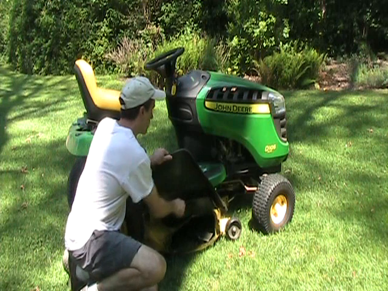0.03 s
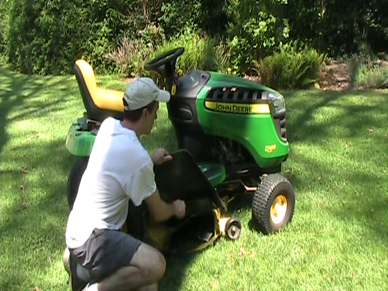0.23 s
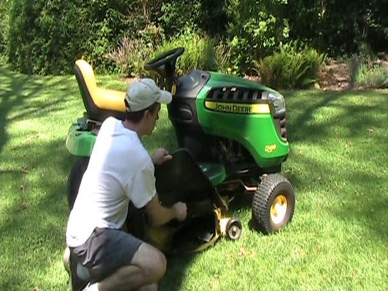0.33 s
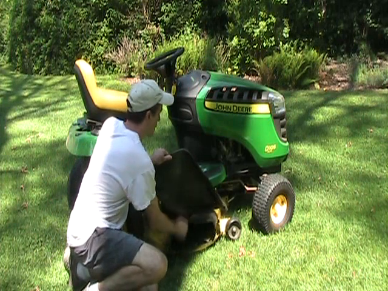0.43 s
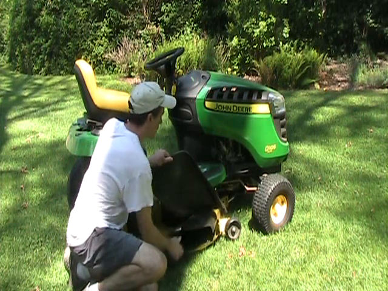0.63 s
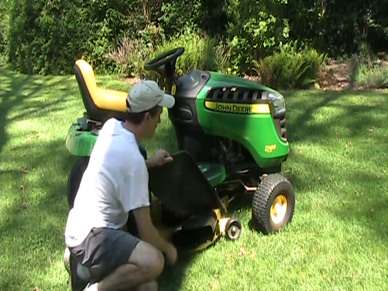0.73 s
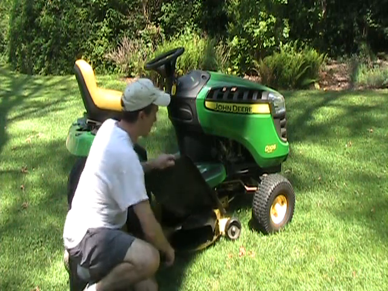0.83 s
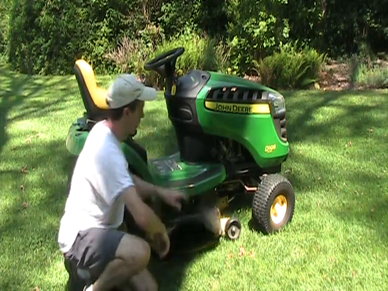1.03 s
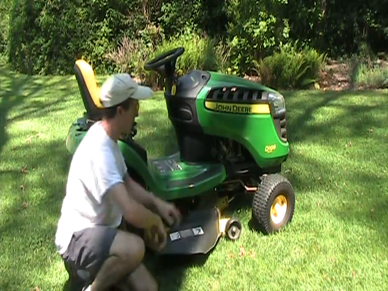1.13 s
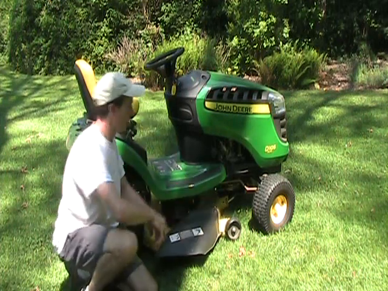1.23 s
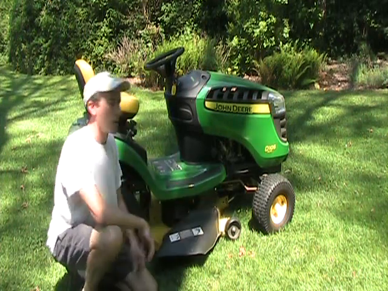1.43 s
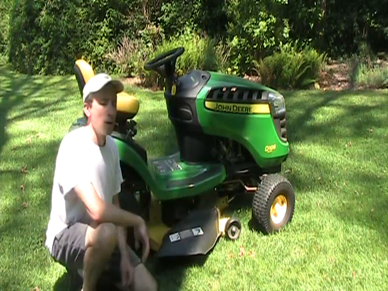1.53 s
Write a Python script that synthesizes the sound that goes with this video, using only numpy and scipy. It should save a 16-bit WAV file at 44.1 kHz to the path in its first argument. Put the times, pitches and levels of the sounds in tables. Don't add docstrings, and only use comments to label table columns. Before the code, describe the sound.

A hinged plastic mower chute is handled and dropped: gritty metal scrapes and thin squeaks, a sharp hollow knock midway, more faint scraping, then a loud clattering fall with quick bounces, close microphone in a quiet garden.

```python
import sys
import numpy as np
from scipy import signal
from scipy.fft import rfft, irfft
from scipy.io import wavfile
from scipy.ndimage import uniform_filter1d

SR = 44100
rng = np.random.default_rng(int(sys.argv[2]) if len(sys.argv) > 2 else 0)


def master_out(mix):
    frames = np.transpose(np.atleast_2d(mix))
    ceiling = np.clip(frames, -1, 1)
    pcm = np.round(ceiling * 32767).astype(np.int16)
    wavfile.write(sys.argv[1], SR, pcm)


def voltage_ratio(level):
    return 10 ** (np.asarray(level, float) / 20)


N = 70560


def evened(x):
    return x / np.sqrt(np.mean(x ** 2) + 1e-20)


def read(points, hz):
    f, value = np.transpose(points)
    return np.interp(np.log(hz + 1), np.log(f + 1), value)


def add(mix, s, sound):
    part = mix[max(round(s * SR), 0):][:len(sound)]
    part += sound[:len(part)]


def coloured(x, points):
    size = x.shape[-1]
    gain = voltage_ratio(read(points, np.fft.rfftfreq(size, 1 / SR)))
    return irfft(rfft(x) * gain, size)


def slow(span_s):
    span = round(span_s * SR)
    return evened(uniform_filter1d(uniform_filter1d(rng.standard_normal(N), span), span))


def resonate(x, hz, width_hz):
    turn = np.exp(2j * np.pi * np.cumsum(hz * np.ones(len(x))) / SR)
    r = np.exp(-np.pi * width_hz / SR)
    return 2 * (turn * signal.lfilter([1 - r], [1, -r], x / turn)).real


def rung(x, modes):
    waver_db, waver_s, drift = 2, 0.014, 0.0048
    out = np.zeros(N)
    for hz, width_hz, db in modes:
        drive = x * voltage_ratio(waver_db * slow(waver_s))
        moving_hz = hz * (1 + drift * slow(waver_s))
        gain = voltage_ratio(db) * np.sqrt(SR / (2 * np.pi * width_hz))
        out += gain * resonate(drive, moving_hz, width_hz)
    return out


def grit(judder_db):
    grain_db, judder_s = 2, 0.006
    level_db = grain_db * rng.exponential(1, N) + judder_db * slow(judder_s)
    return evened(rng.standard_normal(N) * voltage_ratio(level_db))


def hook():
    # (start [s], length [s], scrape [dB], steel ring [dB], squeak [dB])
    strokes = [(0, 0.12, -35, -35.5, -37), (0.187, 0.084, -34.5, -30.5, -40.5),
               (0.324, .13, -34.5, -30, -33.5), (0.503, 0.13, -35, -28.5, -36),
               (0.637, 0.003, -28, -49, -46), (0.645, 0.013, -23, -49, -38),
               (0.714, 0.0069, -50, -57.5, -50), (0.776, 0.046, -32.5, -33.5, -43),
               (0.983, 0.037, -37, -35, -46), (1.157, 0.058, -37.5, -31, -44),
               (1.178, 0.021, -27, -39, -55), (1.217, 0.018, -26, -45, -43),
               (1.252, 0.028, -32, -28.5, -35.5), (1.301, 0.028, -36, -41, -48),
               (1.374, 0.048, -37, -37, -43), (1.402, 0.0069, -48, -50, -41.5)]
    # (frequency [Hz], level [dB per Hz])
    scrape = [(300, -13.5), (600, -9), (1900, -2.5), (3050, -11.5), (4200, -5.5), (6200, -10.5),
              (8500, -3.5), (11000, -26), (15800, -54)]
    # (frequency [Hz], width [Hz], level [dB])
    plate = [(1490, 93, -13), (1836, 200, -8.5), (2330, 20, -13), (2685, 30, -14), (3600, 510, -8),
             (4235, 68, -9.5)]
    # (frequency [Hz], width [Hz], level [dB])
    steel = [(6780, 81, -19), (7420, 69, -4), (7660, 61, -1.5), (7840, 80, -2), (8060, 77, -0.5),
             (8510, 85, -2), (8910, 80, -10.5), (9540, 88, -15), (10160, 87, -12.5), (11090, 68, -12),
             (12300, 98, -28), (13800, 110, -40)]
    # (time [s], frequency [Hz])
    squeak_pitch = [(.12, 5400), (.34, 5358), (.45, 5230), (.50, 5330), (.53, 5450), (.592, 5520),
                    (.596, 5950), (.625, 6140), (.63, 5400)]
    # (frequency [Hz], width [Hz], level [dB])
    singing = [(8010, 60, -2), (8200, 65, 1.5), (8540, 70, -6)]
    bite_s, lift_t60_s = 0.00051, 0.053
    arch_depth_db = np.array([[1.5], [5], [4.5]])
    ring_judder_db, hiss_judder_db, squeak_judder_db = 5 - 3, 1.5, 4.5

    t = np.arange(N) / SR
    power = np.zeros((3, N))
    for start, length, *levels_db in strokes:
        u = t - start
        arch_db = arch_depth_db * (np.sin(np.pi * np.clip(u / length, 0, 1)) - 1)
        lift_db = -60 * np.clip(u - length, 0, 1) / lift_t60_s
        shape = np.clip(u / bite_s, 0, 1) * voltage_ratio(arch_db + lift_db)
        power += (shape * voltage_ratio(np.array(levels_db))[:, None]) ** 2
    hiss, ring, squeak = np.sqrt(power)

    hz = np.interp(t, *np.transpose(squeak_pitch))
    shaky_hz = hz * (1 + 0.0061 * slow(0.00243))
    pure = 0.84 * voltage_ratio(squeak_judder_db * slow(0.0089)) * np.sin(2 * np.pi * np.cumsum(shaky_hz) / SR)
    rough = rung(squeak * grit(ring_judder_db), [(hz, 53, -6)] + singing)

    hiss = hiss * voltage_ratio(1.4 * slow(0.017)) * grit(hiss_judder_db)
    metal = rung(hiss, plate) / 2 + rung(ring * grit(ring_judder_db), steel) / 2
    return 2 * coloured(hiss, scrape) + metal + squeak * pure + rough


def panel(blows, modes, clatter_db):
    # (frequency [Hz], level [dB per Hz])
    clatter = [(60, -11), (200, -13), (500, -3), (1500, 6.5), (3000, 6.5), (6000, 0.5), (10000, -3),
               (15000, -14)]
    # (frequency [Hz], t60 [s])
    clatter_t60 = [(80, 0.089), (300, 0.22), (1000, 0.17), (3000, 0.055), (8000, 0.11)]
    rattle_share, cut_hz = 0.69, 134
    out, t = np.zeros(N), np.arange(SR // 2) / SR
    ms = t[:2048] * 1000
    for s, db, contact_ms, rattle_ms in blows:
        ring = np.zeros(len(t))
        for hz, mode_db, t60 in modes:
            c, d = rng.uniform(-1, 1, 2)
            tone = np.sin(2 * np.pi * hz * (1 + 0.03 * c * d) * t)
            ring += np.sign(d) * voltage_ratio(mode_db - 60 * t / t60 + 4.1 * c) * tone

        hz, u, z = signal.stft(rng.standard_normal(len(t)), SR, nperseg=256)
        decay_db = -60 * u / read(clatter_t60, hz)[:, None]
        z = z * voltage_ratio(read(clatter, hz)[:, None] + decay_db)
        dense = signal.istft(z, SR, nperseg=256)[1][:len(t)]
        body = ring / 2 + voltage_ratio(clatter_db) * dense

        push = ms * np.exp(-ms / (contact_ms / 2))
        rattle = rng.standard_normal(2048) * np.exp(-ms / rattle_ms)
        force = rattle_share * rattle / np.linalg.norm(rattle) + (ms == 0)
        sound = signal.fftconvolve(signal.fftconvolve(force, push)[:2048], body)
        add(out, s, voltage_ratio(db) * sound / (3 * np.std(sound[:SR // 50])))
    return signal.sosfilt(signal.butter(3, cut_hz, "high", fs=SR, output="sos"), out)


def chute_fall():
    # (time [s], peak [dB], contact [ms], rattle [ms])
    blows = [(1.1808, -8.5, 0.083, 1.8), (1.1845, -3.5, 0.082, 7.3), (1.193, -6.5, 0.12, 6.8),
             (1.202, -10.5, 0.87, 5.2), (1.214, -10, 0.27, 2), (1.224, -12, 0.26, 7.2),
             (1.236, -21, 0.1, 4.8), (1.257, -21.5, 0.34, 8.4), (1.277, -20.5, 0.34, 11),
             (1.292, -24, 0.1, 4), (1.312, -22.5, 0.39, 17), (1.335, -26.5, 0.33, 6.5),
             (1.355, -25, 0.55, 16), (1.375, -30, 0.26, 4.5), (1.39, -29, 0.9, 32)]
    # (frequency [Hz], level [dB], t60 [s])
    modes = [(287, -0.5, 0.056), (464, -8, .05), (524, -4.5, 0.042), (611, -6, 0.044), (840, -8, 0.037),
             (1050, 0.5, 0.057), (1085, -5.5, 0.11), (1587, -2, 0.048), (1863, -16, 0.042),
             (2330, -0.5, .06), (2627, -4, .05), (3100, -3, 0.054), (3500, -7, 0.044)]
    return panel(blows, modes, clatter_db=3.5)


def cover_knocks():
    # (time [s], peak [dB], contact [ms], rattle [ms])
    blows = [(.132, -23, 0.26, 3.3), (.190, -25, 0.57, 3.9), (.293, -29.5, 0.77, 3.7),
             (.335, -29.5, 0.13, 10), (.552, -16, 0.37, 22), (.5682, -2.5, 0.084, 2.4),
             (.577, -12.5, 1, 2.1), (.592, -10.5, 0.3, 1.4), (.622, -20, 0.71, 5), (.641, -33, 0.2, 9.6),
             (.648, -19.5, 0.2, 7.1), (.663, -20, 0.9, 6.4), (.702, -26, 0.032, 5), (.768, -25.5, 0.2, 21),
             (.8, -25.5, 0.74, 5.3)]
    # (frequency [Hz], level [dB], t60 [s])
    modes = [(261, -6.5, 0.058), (342, -4.5, 0.07), (505, -1.5, 0.047), (858, 2, 0.032), (1110, 0.5, 0.093),
             (1194, -14, 0.051), (1553, 3, 0.047), (1765, -1.5, 0.054), (2150, -3, 0.068), (2678, 3, 0.04),
             (3200, 1, 0.03)]
    return panel(blows, modes, clatter_db=1.5)


def finger_taps():
    # (time [s], peak [dB], contact [ms], rattle [ms])
    taps = [
        (.4932, -19.5, 0.18, 1),
        (.4955, -16, 0.21, 1),
    ]
    # (frequency [Hz], level [dB], t60 [s])
    hollow = [(410, -9, .03), (820, -3, .03), (1190, 1.5, .022), (1530, -7, .05), (2200, -14, .03),
              (2780, -14, .03)]
    return panel(taps, hollow, clatter_db=-14)


def booms():
    # (time [s], length [s], peak [dB], frequency [Hz])
    swells = [(.472, .01, -34.5, 380), (.494, .014, -25, 827), (.497, 0.01, -26, 394),
              (1.182, 0.0089, -17, 3100), (.505, 0.025, -32, 1950), (.525, .02, -32, 1750),
              (.572, 0.019, -22, 200), (.577, 0.011, -19, 830), (.568, 0.01256, -11, 1670),
              (.569, .006, -19, 443), (.576, 0.0083, -19.5, 408), (.589, 0.012, -14.5, 295),
              (.618, 0.0094, -41, 1580), (.634, 0.02, -25.5, 263), (.652, 0.031, -36.5, 2658),
              (.661, 0.0095, -22, 555), (.678, 0.014, -33, 261.2), (.706, 0.013, -27, 330),
              (1.183, 0.033, -24, 103.3), (1.185, 0.01, -10.5, 1105), (1.195, 0.013, -10.5, 512),
              (1.21, 0.0067, -11, 514), (1.22, 0.011, -9.5, 519), (1.25, 0.029, -28, 1090),
              (1.27, 0.0204, -25, 622), (1.297, 0.03, -24.5, 465), (1.337, 0.0044, -37, 1050),
              (.985, 0.029, -39.5, 4240), (1.38, 0.048, -42, 4240), (1.408, 0.0066, -38, 195),
              (.236, 0.025, -38, 2652), (.196, 0.028, -44, 4420)]
    out = np.zeros(N)
    for s, length, db, hz in swells:
        u = np.arange(0, 1, 1 / (length * 1.27 * SR))
        swell = np.sin(np.pi * u ** 0.55) ** 2
        add(out, s, voltage_ratio(db) * swell * np.sin(2 * np.pi * hz * np.arange(len(u)) / SR))
    return out * (1 + 0.34 * slow(0.0026))


def clinks():
    # (time [s], peak [dB], frequency [Hz], t60 [s])
    touches = [(0.104, -39, 9900, 0.01), (0.133, -36, 6960, 0.016), (.282, -48, 6600, 0.035),
               (0.642, -18, 8500, 0.012), (0.648, -14.5, 6860, 0.023), (0.716, -40, 11360, 0.0081),
               (.723, -30.5, 6970, 0.029), (0.769, -29, 7200, 0.0087), (.945, -68, 11000, .006),
               (1.193, -13.5, 6900, 0.023), (1.225, -21, 6700, 0.03), (1.242, -24.5, 7120, 0.04),
               (1.391, -30.5, 6180, 0.031)]
    out, t = np.zeros(N), np.arange(4096) / SR
    for s, db, hz, t60 in touches:
        pair = np.sin(2 * np.pi * hz * t) + 0.65 * np.sin(2 * np.pi * hz * 0.96 * t)
        tick = 0.44 * uniform_filter1d(rng.standard_normal(4096), size=2) * voltage_ratio(-60 * t / 0.017)
        add(out, s, voltage_ratio(db) * (pair * voltage_ratio(-60 * t / t60) + tick))
    return out


def hinge():
    # (time [s], length [s], from [Hz], to [Hz], level [dB])
    chirp = (1.095, 0.045, 4100, 5350, -56)
    s, length, low_hz, high_hz, db = chirp
    u = np.arange(0, 1, 1 / (length * SR))
    hz = low_hz + (high_hz - low_hz) * u
    rub = resonate(resonate(rng.standard_normal(len(u)), hz, 200), hz, 200)
    out = np.zeros(N)
    add(out, s, voltage_ratio(db) * np.sin(np.pi * u ** 2) * evened(rub))
    return out


def near_width(near):
    # (frequency [Hz], side against mid [dB])
    width = [(300, -57), (1500, -60), (2500, -28), (4000, -16), (9000, -16), (14000, -13.5)]
    smear = rng.standard_normal(512) * np.exp(-np.arange(512) / 150)
    side = coloured(signal.fftconvolve(near, smear / np.linalg.norm(smear))[:N], width)
    return np.array([side, -side])


def yard(near):
    level_db, t60_s, dull_hz, echoes_per_s = -14, 0.34, 4500, 2000
    t = np.arange(SR // 2) / SR
    hits = rng.random((2, len(t))) < echoes_per_s / SR
    taps = rng.standard_normal((2, len(t))) * hits * voltage_ratio(-60 * t / t60_s) * (t > 0.004)
    taps = signal.lfilter(*signal.butter(1, dull_hz, fs=SR), taps + 1.23 * taps[::-1])
    echoes = signal.fftconvolve(near[None], taps / np.linalg.norm(taps[0]), axes=1)[:, :N]
    return voltage_ratio(level_db) * (echoes.mean(0) + 0.051 * (echoes - echoes[::-1]))


def air():
    # (frequency [Hz], level [dB per Hz])
    hum = [(30, -49), (55, -11), (120, 2), (200, -6.5), (600, -12), (1300, -20), (4000, -26), (9000, -36.5),
           (15800, -53)]
    # (frequency [Hz], left-right correlation [0-1])
    likeness = [(60, 1), (240, 0.81), (950, 0.69), (3770, 0.134), (15000, 0.053)]
    hz = np.fft.rfftfreq(1024, 1 / SR)
    a, b, c, d = rng.standard_normal((4, 513, N // 256 + 5))
    same = np.clip(read(likeness, hz), -1, 1)[:, None]
    left = a + 1j * b
    right = same * left + np.sqrt(1 - same ** 2) * (c + 1j * d)
    z = np.array([left, right]) * voltage_ratio(read(hum, hz))[:, None]
    return voltage_ratio(-41) * evened(signal.istft(z, nperseg=1024, noverlap=768)[1][:, :N])


def scene():
    knocks = finger_taps() + cover_knocks() + chute_fall()
    near = hook() + knocks + clinks() + hinge() + booms()
    return near + near_width(near) + yard(near) + air()


def low_pass(x):
    return signal.sosfilt(signal.butter(12, 15900, fs=SR, output="sos"), x)


def record(dry):
    limit = 1.25
    soft = limit * np.tanh(dry / limit)
    edge = signal.firwin(511, 15850, window=("kaiser", 9), fs=SR)
    mix = signal.oaconvolve(soft, edge[None], "same")
    return low_pass(mix)


dry = scene()
out = record(dry)
master_out(out)
```